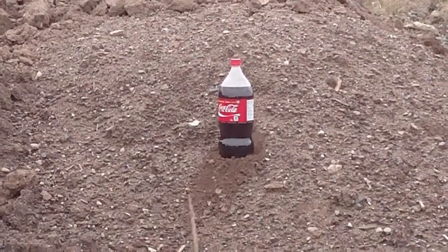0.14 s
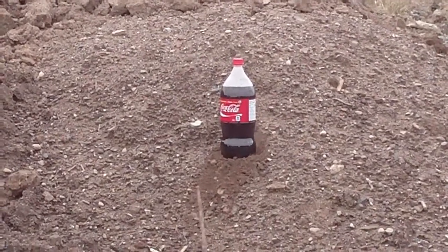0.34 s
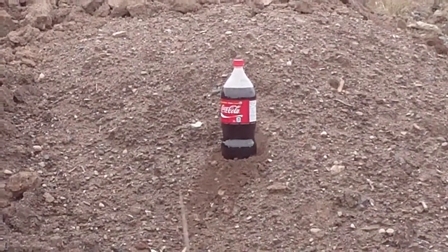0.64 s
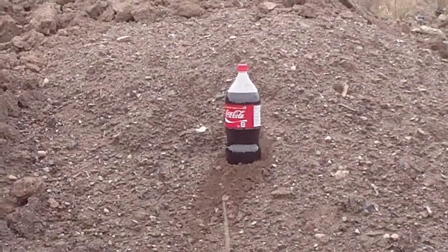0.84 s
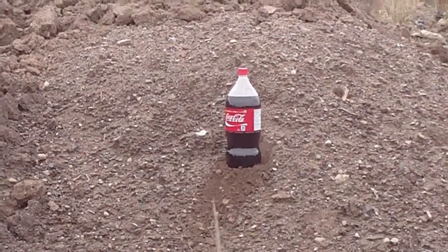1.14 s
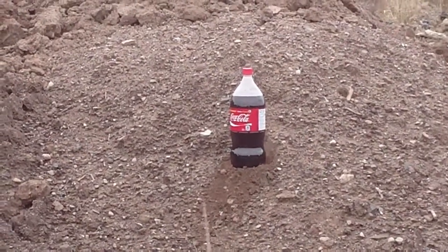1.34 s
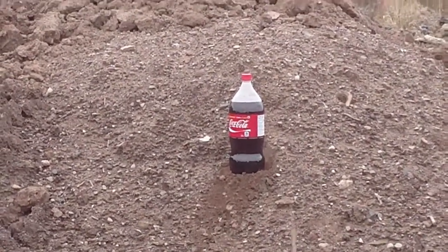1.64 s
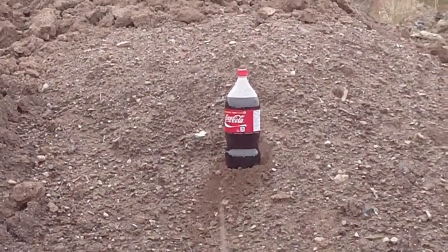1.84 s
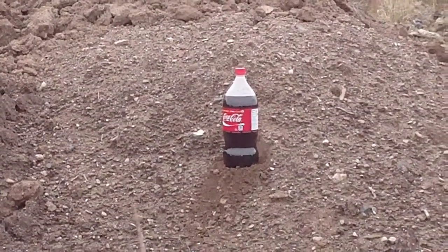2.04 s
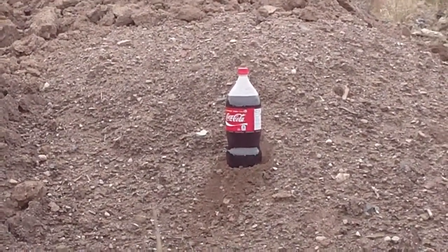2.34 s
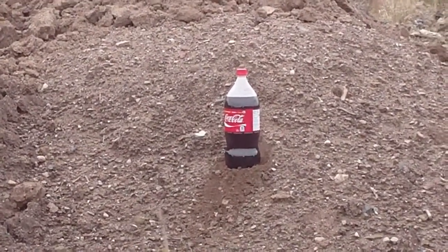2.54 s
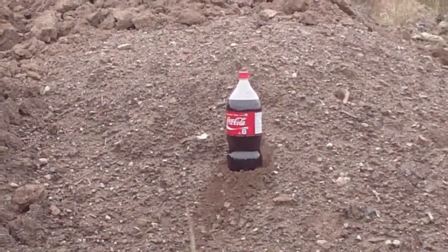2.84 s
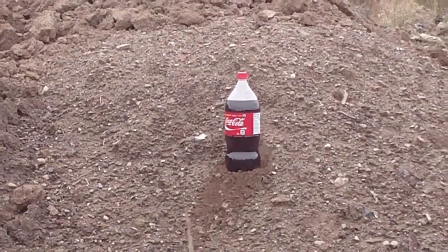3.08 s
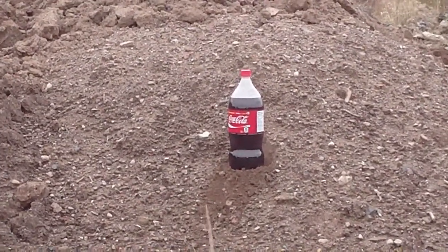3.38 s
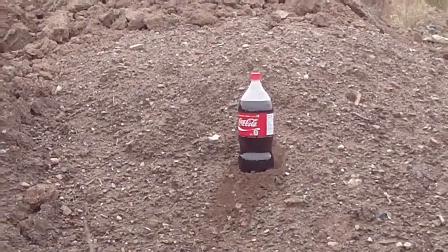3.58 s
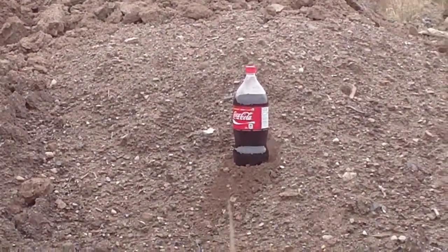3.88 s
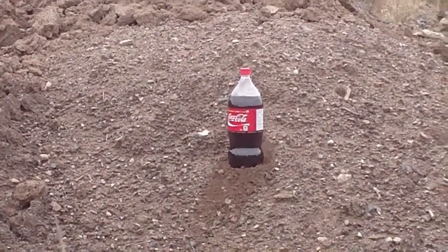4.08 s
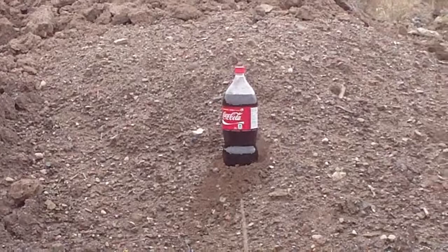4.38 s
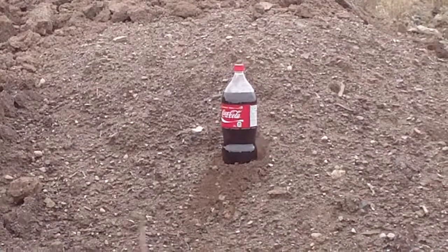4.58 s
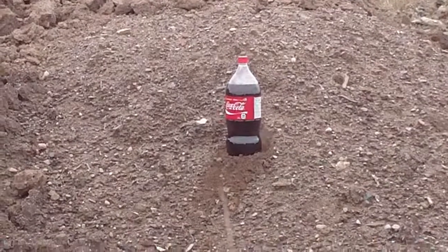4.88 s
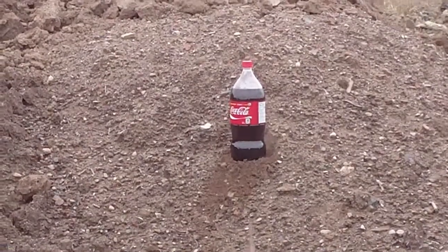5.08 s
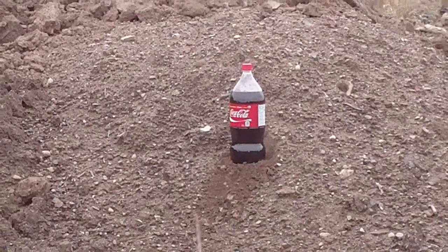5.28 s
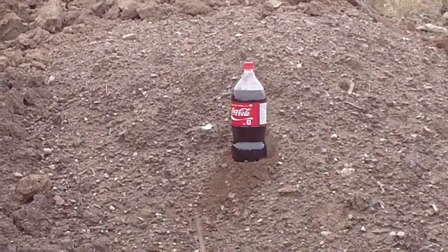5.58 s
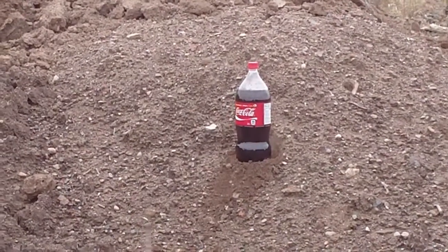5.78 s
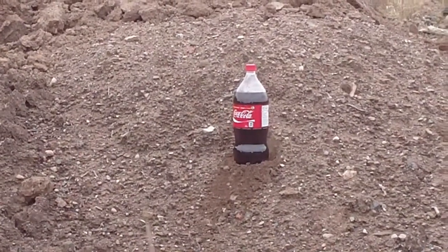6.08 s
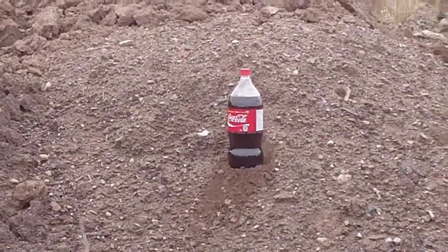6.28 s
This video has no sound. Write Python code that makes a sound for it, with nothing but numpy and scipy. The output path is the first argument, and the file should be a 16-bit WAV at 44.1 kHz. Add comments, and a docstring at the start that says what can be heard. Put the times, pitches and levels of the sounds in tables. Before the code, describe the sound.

An open-air scene of nearly six and a half seconds, close to the gun and almost mono. Wind rumbles on the microphone from the start, with fluttering, whirling puffs and low thumps until about 0.9 s. Single airsoft shots crack at 0.55, 2.27, 3.7 and 5.38 s: very loud, abrupt, clipped noise bursts with a brief ringing gun body and short ground scatter. About 20 ms later a full plastic bottle gives a damped pop, fused to the crack. Around 0.1 s after each shot the action clacks and ticks home with a small bounce; about a quarter second after each shot a pellet ticks very faintly on gravel. Wind eases around 2-3 s, then returns in low gusts and buffets from 3.2 s to the end. Soft hollow camera-case knocks appear from 3.9 s, clearest near 6.26 s. Faint distant rush and fine hiss continue throughout.

```python
"""Airsoft shots in the wind

A close airsoft machine pistol fires four single shots at a full plastic bottle on a dirt mound.
Each crack is shaped noise and a ringing gun body that overload the input; the pellet pops on the bottle
about 20 ms later, the action ticks and clacks home, and a spent pellet lands on gravel.
Wind is low-frequency noise in gusts and single pressure swings, with soft knocks of the camera's case
later on, over a far, even rush and hiss made of steady noise."""
import sys
import numpy as np
from scipy import signal
from scipy.fft import rfft, irfft, next_fast_len
from scipy.io import wavfile
from scipy.ndimage import uniform_filter1d

SR = 44100
rng = np.random.default_rng(int(sys.argv[2]) if len(sys.argv) > 2 else 0)


def transcribe(signal):
    """Save signal, clipped to [-1, 1], as a 16-bit WAV file at the path in sys.argv[1]."""
    frames = np.atleast_2d(signal).T
    limited = np.clip(frames, -1, 1)
    pcm = np.round(limited * 32767).astype(np.int16)
    wavfile.write(sys.argv[1], SR, pcm)


N = 283122

# Breeze between gusts. Each row: time in seconds, level in dB.
BREEZE_LEVEL = [(0, -18.5), (.55, -24), (1.08, -24), (1.22, -28.5), (1.55, -26), (2.25, -35), (2.95, -30),
                (3.15, -33), (4.28, -31.5), (4.6, -24), (5.15, -25.5), (6.2, -23.5), (6.4, -30.5)]
# Gusts of wind. Each row: start in seconds, length in seconds, level in dB.
WIND_GUSTS = [(0, 0.079, -25), (0.117, 0.069, -17.5), (0.231, 0.076, -22), (.41, 0.12, -22.5),
              (0.696, 0.11, -19), (0.93, .035, -19.5), (1.03, .03, -22.5), (1.306, 0.036, -19),
              (1.69, 0.04, -23.5), (1.961, 0.018, -20.5), (2.461, 0.056, -21), (2.569, 0.18, -26),
              (3.221, 0.044, -16.5), (3.298, .18, -18.5), (3.825, 0.02, -16.5), (3.911, 0.047, -14.5),
              (4.115, 0.036, -23), (4.346, 0.031, -19), (4.43, 0.027, -21), (4.497, .07, -15),
              (4.68, 0.12, -19), (4.876, 0.052, -23), (4.997, 0.058, -19), (5.355, .035, -15.5),
              (5.712, 0.031, -17.5), (5.91, 0.059, -16.5), (6.14, .17, -18.5)]
# Far rush. Each row: time in seconds, level in dB.
FAR_RUSH_LEVEL = [(0, -39.5), (2.1, -40.5), (3.5, -37.5), (5.1, -40), (5.9, -39.5), (6.4, -42)]
# Hard buffets of wind on the microphone. Each row: start in seconds, relative level in dB,
# swing rate in Hz, depth in dB of the background's brief dip (none if zero or negative).
WIND_BUFFETS = [(.147, -12.5, 92, 1.5), (0.1722, -24, 68.5, 11), (0.2536, -8.5, 84.5, 6.5),
                (.3691, -6.5, 109, 7), (1.333, -9.5, 117, 0), (3.234, -7, 123, 0), (3.315, -11, 110, 0),
                (3.849, -8.5, 81, 4), (3.9311, -4.5, 186, 3), (3.94, -7.5, 114, 2), (3.9731, -2, 156, 10),
                (4.525, -5, 164, -2.5), (4.695, -5, 104, 1.5), (4.7691, -9, 136, 6.5),
                (4.9056, -11, 120, 6), (5.224, -5.5, 150, 2), (5.968, -2, 85, 1), (5.985, -17, 171, 11.5),
                (6.1939, -6.5, 110, 3.5), (6.2603, -1, 136, 9.5), (6.2947, -11.5, 100, 6.5)]
# Shots. Each row: start in seconds, relative crack level in dB, pellet's flight in seconds,
# delay until the bolt is home in seconds, relative clack level in dB, relative bounce level in dB.
GUN_SHOTS = [(0.5466, 2.5, .0187, .0992, -17, -28), (2.2697, 2, .020, 0.11, -17.5, -21.5),
             (3.6968, 1, .0203, 0.11, -13, -13.5), (5.384, 1, 0.021, .1083, -13.5, -24.5)]
# Light contacts of the action in every cycle (latch, slide, settling). Each row: time from bolt home
# in seconds, relative level in dB, bright tick against dull clack in dB.
ACTION_CONTACTS = [(-.0335, -30, 0.5), (-.0155, -27.5, -6), (.0215, -33.5, -1)]
# Spent pellets landing on gravel. Each row: start in seconds, level in dB.
PELLET_LANDINGS = [(.7630, -37), (2.5395, -37.5), (3.9315, -38), (5.6603, -37)]
# Soft hollow knocks on the camera's case. Each row: start in seconds, relative level in dB.
CASE_KNOCKS = [(3.932, -24.5), (3.973, -24), (4.769, -29), (5.225, -26), (5.921, -29), (5.971, -22.5),
               (5.984, -27.5), (6.054, -29.5), (6.175, -26), (6.262, -16.5)]
# Resonances of the gun's body. Each row: frequency in Hz, width in Hz (55 at least), gain in dB.
GUN_MODES = [(587, 81, 6), (1264, 70, 6), (2233, 20, -3.5), (2610, 78, 1.5), (3384, 80, 2.5), (3600, 80, 2),
             (5113, 59, 3.5), (5070, 63, 3.5), (5400, 60, -10), (6400, 47, -8), (7070, 52, -10.5),
             (7750, 89, -4), (7030, 20, 2.5), (7430, 29, 3), (8350, 78, -1), (9100, 72, -5.5),
             (10700, 100, -0.5)]

# Noise spectra of each sound. Each row: frequency in Hz, relative density in dB per Hz.
RUMBLE_SPECTRUM = [(12, -3.5), (28, -7), (55, 2.5), (100, 1.5), (160, -5.5), (230, -15), (400, -28),
                   (1000, -73.5)]
FLUTTER_SPECTRUM = [(100, -10), (200, 10), (320, 0), (480, -12), (750, -25), (1400, -30.5), (2800, -45.5),
                    (4000, -57), (9000, -66)]
WHIRL_SPECTRUM = [(200, 2), (450, 9), (800, 5.5), (1300, -4.5), (2000, -16), (2900, -17.5), (3900, -36.5),
                  (9000, -51.5)]
RUSH_SPECTRUM = [(40, 9.5), (200, -5.5), (450, -3), (750, 2.5), (950, 3), (1300, -1.5), (1700, -12.5),
                 (2200, -23.5), (4000, -47), (12000, -59.5)]
HISS_SPECTRUM = [(1200, -4.5), (2200, 0.5), (3300, 1.5), (4300, -5.5), (6000, -5), (7800, -4), (9500, -7.5),
                 (10700, -7), (12000, -14.5), (13500, -10.5), (15000, -12.5)]
CRACK_SPECTRUM = [(100, -8), (350, 2.5), (800, -3.5), (1050, -24), (1850, -12), (2400, -7.5), (3400, -3.5),
                  (4200, -19), (5100, -5.5), (7300, -6), (8800, -14), (10400, -7), (12000, -26.5),
                  (13600, -11), (15300, -20)]
SCATTER_SPECTRUM = [(150, 8.5), (700, -10.5), (1300, -2), (1800, -12), (2900, -1), (4300, -10.5),
                    (5300, -6.5), (7400, 0), (8300, -6.5), (10500, -9), (12100, -17), (13500, -18),
                    (15300, -17.5)]
CLACK_SPECTRUM = [(200, -12.5), (900, -13), (1300, 4), (1650, -13.5), (2100, -3.5), (2700, 4.5),
                  (3500, 1.5), (4300, -10), (5000, -3), (7000, -5), (8200, -10.5), (11000, -17),
                  (15000, -19)]
TICK_SPECTRUM = [(500, -35), (3000, 9), (4500, -3.5), (6000, -1), (8500, -5.5), (10200, 5.5), (11200, 2.5),
                 (12000, -12), (12900, 3.5), (15000, -5)]

LULL_DB, LULL_RATE_HZ = 3, 7   # greatest chance swing of the breeze, and its rate
GUST_RISE_S, GUST_FALL_S = 0.016, 0.037
TYPICAL_GUST_DB = -20
FLUTTER_DB, FLUTTER_GROWTH = -30, 1.66   # fine eddies in a typical gust; dB they gain per dB of wind
WHIRL_DB, WHIRL_GROWTH = -33.5, 0.9   # the same for air whirling in the port
# The wind meets the port head-on at first, then turns and whirls less.
HEAD_ON_UNTIL_S, TURN_S, SHELTER_DB = 0.86, 0.058, 17
DIP_DELAY_S, DIP_RECOVERY_DB_PER_S = 0.0025, 39   # the background sinks after a buffet, then creeps back
# Tick against clack as the bolt hits home, and as it bounces once.
HOME_BRIGHT_DB, BOUNCE_S, BOUNCE_BRIGHT_DB = -4, 0.0088, -13
CUTOFF_HZ = 15300


def from_db(db):
    """A level in decibels is twenty times the logarithm of an amplitude ratio."""
    return 10 ** (np.asarray(db) / 20)


def rms_one(x):
    """Division by the root mean square gives a signal unit mean power."""
    return x / np.sqrt(np.mean(x ** 2) + 1e-20)


def in_time(rows):
    """Linear interpolation turns each column of a curve into a value per sample."""
    s, *columns = np.transpose(rows)
    return [np.interp(np.arange(N) / SR, s, c) for c in columns]


def add(track, s, sound):
    """Superposition: a sound starting at s seconds adds to the pressure already there."""
    start = int(np.clip(round(s * SR), 0, N))
    track[start:start + len(sound)] += sound[:N - start]


def noise(spectrum):
    """Spectral shaping: white noise weighted bin by bin takes on a colour, here at rms 1."""
    hz, db = np.transpose(spectrum)
    size = next_fast_len(N)
    bins = np.fft.rfftfreq(size, 1 / SR) + 1e-3
    gain = from_db(np.interp(np.log(bins), np.log(hz), db))
    gain = gain * np.minimum(2 * bins / hz[0], 1)   # falls away below half the first frequency
    white = rng.standard_normal(size)
    return rms_one(irfft(rfft(white) * gain, size)[:N])


def drift(rate):
    """White noise through two equal low-pass poles at rate Hz wanders slowly, with rms 1."""
    step = 40   # samples between computed values
    r = np.exp(-2 * np.pi * rate * step / SR)
    white = rng.standard_normal(N // step + 2002)
    slow = signal.lfilter([1], [1, -2 * r, r * r], white)[2000:]   # drop the filter's start-up
    return np.interp(np.arange(N) / step, np.arange(len(slow)), rms_one(slow))


def bursts(rows, rise, hold, t60):
    """Blows (s, dB) swell, hold and decay exponentially; where they overlap, their powers add."""
    t, power = np.arange(SR // 2) / SR, np.zeros(N)
    decay = from_db(-60 * np.maximum(t - hold, 0) / t60)
    shape = np.minimum(t / rise, 1) * decay
    for s, db in rows:
        add(power, s, (from_db(db) * shape) ** 2)
    return np.sqrt(power)


def resonate(x, modes):
    """Modal synthesis: parallel two-pole resonators (Hz, width Hz, dB) sum with alternating signs."""
    out = 0
    for k, (hz, width, db) in enumerate(modes):
        r = np.exp(-np.pi * max(width, 55) / SR)
        poles = [1, -2 * r * np.cos(2 * np.pi * hz / SR), r * r]
        gain = (-1) ** k * from_db(db) * (1 - r * r) / 2
        out = out + gain * signal.lfilter([1, 0, -1], poles, x + 1e-18)
    return out


def wind_level():
    """Addition of powers: gusts swell over a wavering breeze, hold and die away; returned in dB."""
    t = np.arange(N) / SR
    breeze_db, = in_time(BREEZE_LEVEL)
    power = from_db(breeze_db + LULL_DB * np.tanh(drift(LULL_RATE_HZ))) ** 2
    for s, length, db in WIND_GUSTS:
        corners = [-GUST_RISE_S / 2, GUST_RISE_S / 2, length, length + GUST_FALL_S]
        shape = np.interp(t - s, corners, [0, 1, 1, 0])
        power = power + (from_db(db) * shape) ** 2
    return 10 * np.log10(power)


def gusts():
    """Turbulence at the port: slow pressure lumps, with finer eddies strongest on the biggest lumps."""
    rumble_db = wind_level()
    excess_db = rumble_db - TYPICAL_GUST_DB
    turned = np.clip((np.arange(N) / SR - HEAD_ON_UNTIL_S) / TURN_S, 0, 1)
    flutter_db = FLUTTER_DB + FLUTTER_GROWTH * excess_db
    whirl_db = WHIRL_DB + WHIRL_GROWTH * excess_db - SHELTER_DB * turned
    lumps = noise(RUMBLE_SPECTRUM)
    lumps = lumps / np.sqrt(uniform_filter1d(lumps ** 2, size=2600) + 1e-6)   # even out over 59 ms
    riding = rms_one(np.abs(lumps) + .5)
    puffs = rms_one(from_db(3.5 * np.tanh(drift(22))))   # the flow comes in short puffs
    flutter = from_db(flutter_db) * noise(FLUTTER_SPECTRUM)
    whirl = from_db(whirl_db) * noise(WHIRL_SPECTRUM)
    return puffs * (from_db(rumble_db) * lumps + riding * (flutter + whirl))


def background():
    """Stationary noise: far rush and fine hiss share a gain that sinks at buffets and creeps back."""
    t, dip_db = np.arange(N) / SR, np.zeros(N)
    for s, _, _, depth_db in WIND_BUFFETS:
        recovering_db = depth_db - DIP_RECOVERY_DB_PER_S * (t - s)
        dip_db = np.maximum(dip_db, (t > s + DIP_DELAY_S) * recovering_db)
    rush_db, = in_time(FAR_RUSH_LEVEL)
    rush = from_db(rush_db + 1.3 * drift(7.8)) * noise(RUSH_SPECTRUM)
    hiss = from_db(-54.5) * noise(HISS_SPECTRUM)
    return (rush + hiss) * from_db(-dip_db)


def buffets():
    """A passing eddy swings the pressure to and fro; those that dip the background also tick faintly."""
    lead = SR // 40
    t, out = np.arange(-lead, lead) / SR, np.zeros(N)
    for s, db, hz, _ in WIND_BUFFETS:
        cycles = hz * t
        swing = 1.44 * np.sin(2 * np.pi * cycles) * np.exp(-np.abs(cycles) / 0.37)
        snap = 0.54 * np.tanh(t / 0.0005) * np.exp(-(cycles / 0.13) ** 2)
        add(out, s + 0.002155 - lead / SR, from_db(db) * (swing + snap))
    ticking = [(s, -33) for s, _, _, dip_db in WIND_BUFFETS if dip_db > .5]
    edge = bursts(ticking, rise=0.00081, hold=0.00092, t60=0.0041)
    tick = edge * rng.standard_normal(N)
    return out + from_db(-16) * tick + resonate(tick, [(4690, 480, 9), (9800, 550, -1)])


def cracks():
    """Impulsive radiation: the action moves, the blast rings the body, rough ground scatters it back."""
    shots = [(s, db) for s, db, *_ in GUN_SHOTS]
    early = [(s - .005, db) for s, db in shots]
    release = from_db(-28.0) * bursts(early, rise=0.0013, hold=0.0078, t60=.01)
    blast = from_db(-1.5) * bursts(shots, rise=0.00052, hold=0.0053, t60=0.02)
    scatter = from_db(-19.5) * bursts(shots, rise=0.0068, hold=0.021, t60=0.09)
    strikes = scatter * rng.standard_normal(N)   # the scattered sound carries the body's ring too
    puff = np.zeros(N)
    for s, db in shots:
        add(strikes, s + 0.001, from_db([db + 28.5]))
        add(puff, s - .0025, -from_db(db) * np.hanning(SR // 500))
    body = resonate(strikes, GUN_MODES)
    thump = resonate(puff, [(244, 110, 1.0)])   # the slug of air from the barrel swings low
    direct = (release + blast) * noise(CRACK_SPECTRUM)
    return direct + scatter * noise(SCATTER_SPECTRUM) + body + thump


def bottle():
    """Impact on a damped shell: the wall dents in and out once, then rings briefly, damped by water."""
    t = np.arange(SR // 8) / SR
    phase = (t - .001) / 0.00055
    dent = (1 - 2 * phase ** 2) * np.exp(-phase ** 2)
    wall = [(310, 55, -3), (540, 43, 0.0), (834, 30, -8.5), (1340, 45, 10.5)]   # (Hz, width Hz, dB)
    pop = from_db(2.0) * dent + resonate(dent, wall)
    out = np.zeros(N)
    for s, _, flight, *_ in GUN_SHOTS:
        add(out, s + flight, pop)
    return out


def action():
    """Contact impacts: latch and bolt knock on the plastic frame, clack, tick and chatter as they seat."""
    contacts = []
    for s, _, _, home, clack_db, bounce_db in GUN_SHOTS:
        contacts.append((s + home, clack_db, HOME_BRIGHT_DB))
        contacts.append((s + home + BOUNCE_S, bounce_db, BOUNCE_BRIGHT_DB))
        contacts += [(s + home + lag, db, bright) for lag, db, bright in ACTION_CONTACTS]
    knocks = [(s, db) for s, db, bright in contacts]
    ticks = [(s, db + bright) for s, db, bright in contacts]
    chatter = rms_one(from_db(4 * np.tanh(drift(350))))
    clack = chatter * bursts(knocks, rise=0.0014, hold=0.0017, t60=0.03)
    scatter = from_db(-15.0) * bursts(knocks, rise=0.01, hold=0.0095, t60=0.087)
    tick = chatter * bursts(ticks, rise=0.00017, hold=0.00075, t60=0.029)
    strikes = np.zeros(N)
    for s, db in knocks:
        add(strikes, s + 0.00044, from_db([db + 15.5]))
    frame = resonate(strikes, GUN_MODES)
    bolt = resonate(strikes, [(2720, 210, 3.6)])   # the bolt's own short ring
    dull = from_db(-0.5) * (clack + scatter) * noise(CLACK_SPECTRUM)
    bright_noise = (tick + from_db(-7) * scatter) * noise(TICK_SPECTRUM)
    return dull + bright_noise + frame + bolt


def landings():
    """Impact of a small mass: a light pellet ticks on the stones as a short bright noise burst."""
    return bursts(PELLET_LANDINGS, rise=.0005, hold=0.0014, t60=0.019) * noise(TICK_SPECTRUM)


def case_knocks():
    """Struck resonator: fingers shift on the camera and its case answers with a short hollow ring."""
    case = [(509, 83, 9), (930, 356, -8.5), (2260, 360, -57)]   # (Hz, width Hz, dB)
    rub = bursts(CASE_KNOCKS, rise=0.001, hold=0.0021, t60=0.016)
    touch = rub * rng.standard_normal(N) * from_db(13.5)
    for s, db in CASE_KNOCKS:
        add(touch, s + .002, from_db([db + 37.5]))
    return resonate(touch, case)


def scene():
    """Sum and difference: channels nearly agree, the right a trace louder, with very faint
    independent noise between them."""
    gun = cracks() + bottle() + action() + landings()
    mono = gun + gusts() + buffets() + case_knocks() + background()
    # fresh noise, shaped like the gusts and background, enters the channels with opposite signs
    side = from_db(-47) * mono + from_db(-42.5) * gusts() + from_db(-41) * background()
    return np.array([mono - side, mono + side])


def record(dry):
    """Saturation: peaks bend smoothly towards a ceiling; a steep low-pass then cuts the top."""
    ceiling = 0.63
    clipped = dry / (1 + (dry / ceiling) ** 6) ** (1 / 6)
    low_pass = signal.ellip(10, .2, 70, CUTOFF_HZ, fs=SR, output="sos")
    return signal.sosfilt(low_pass, clipped)


dry = scene()
out = record(dry)
transcribe(out)
```